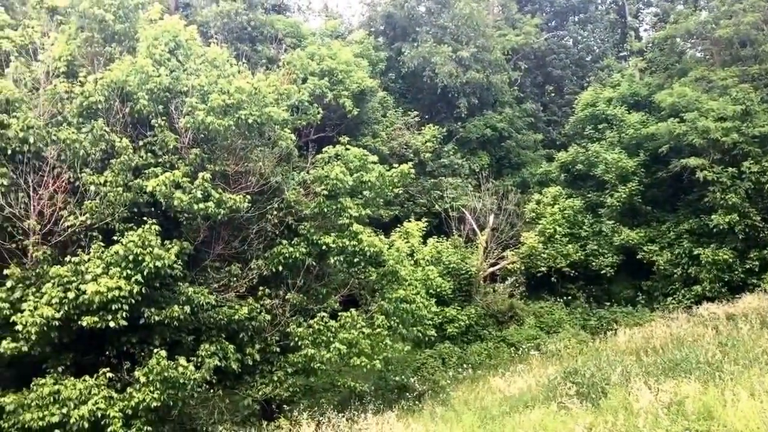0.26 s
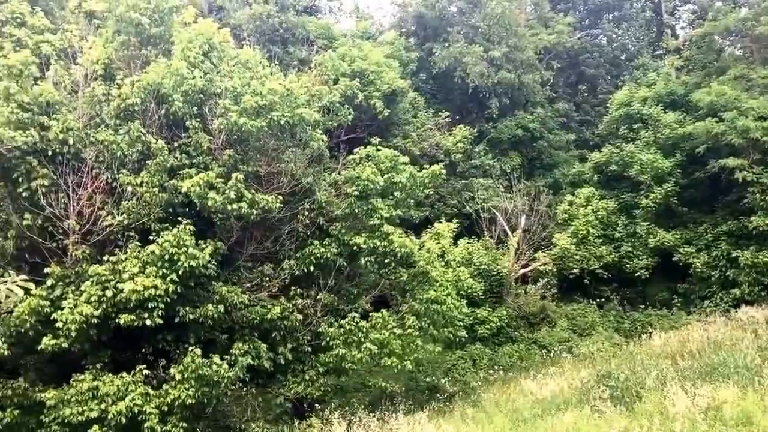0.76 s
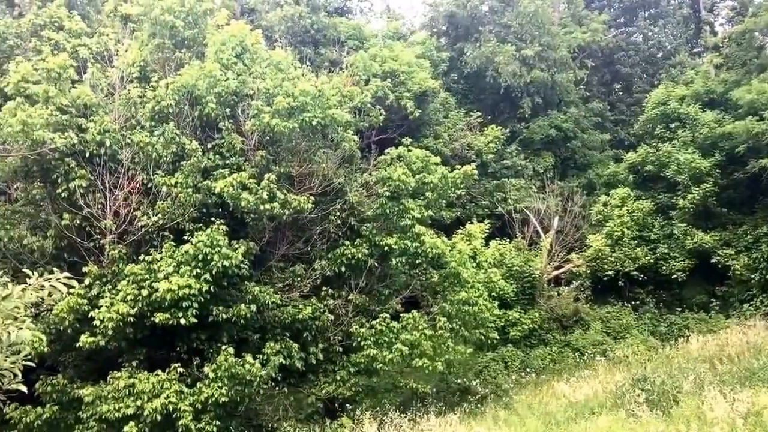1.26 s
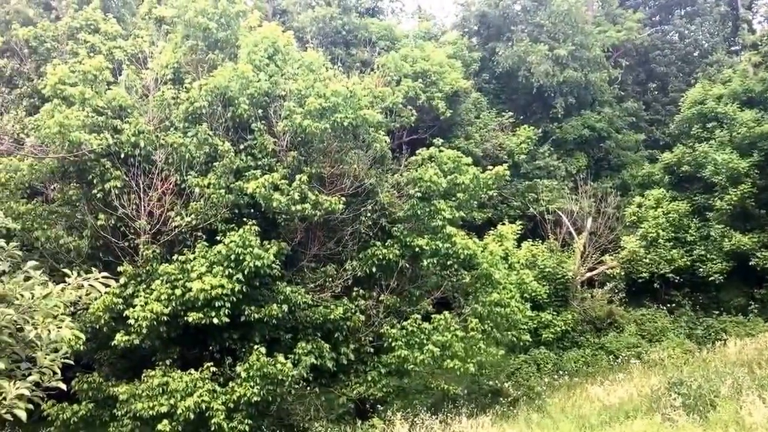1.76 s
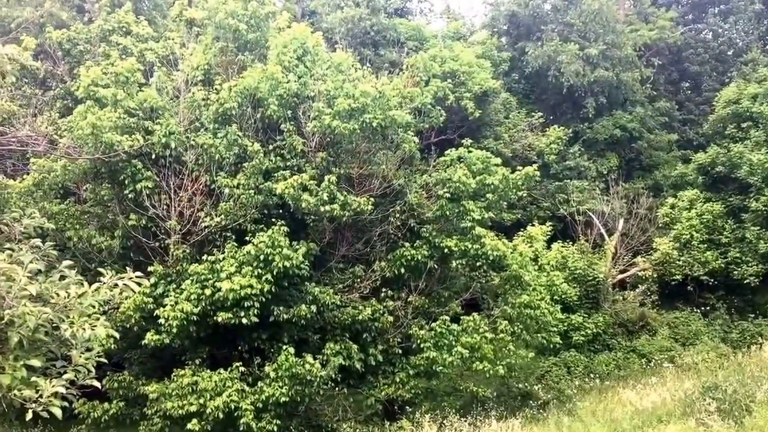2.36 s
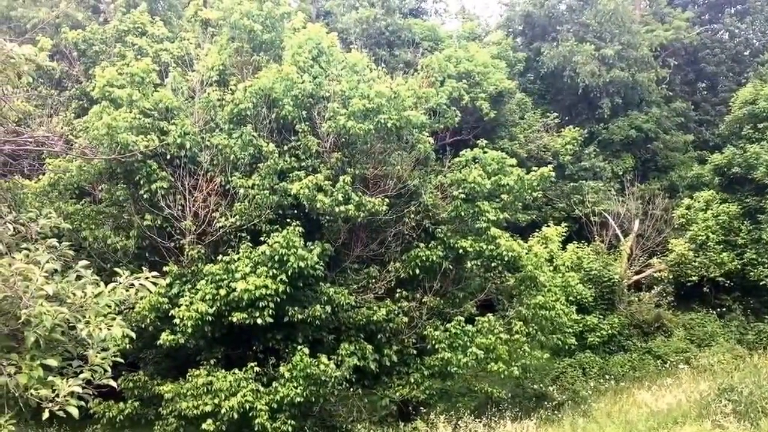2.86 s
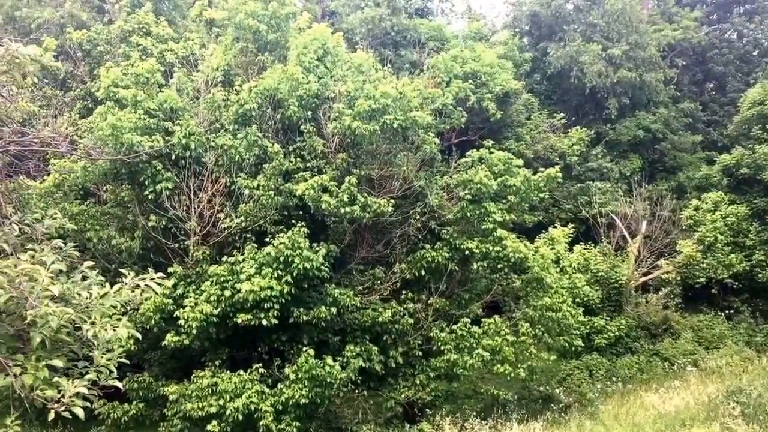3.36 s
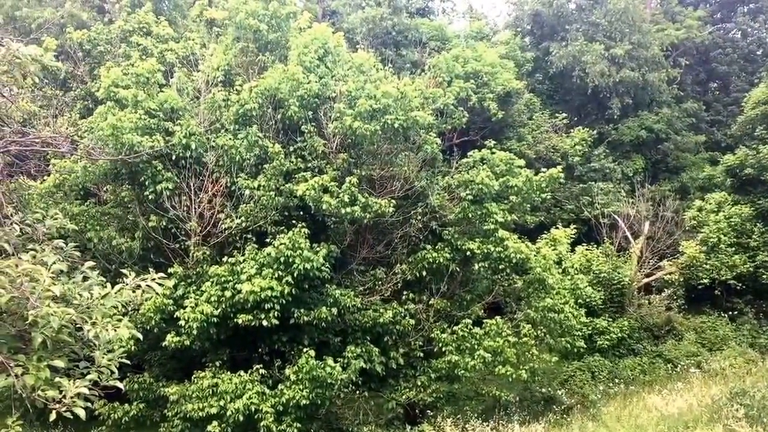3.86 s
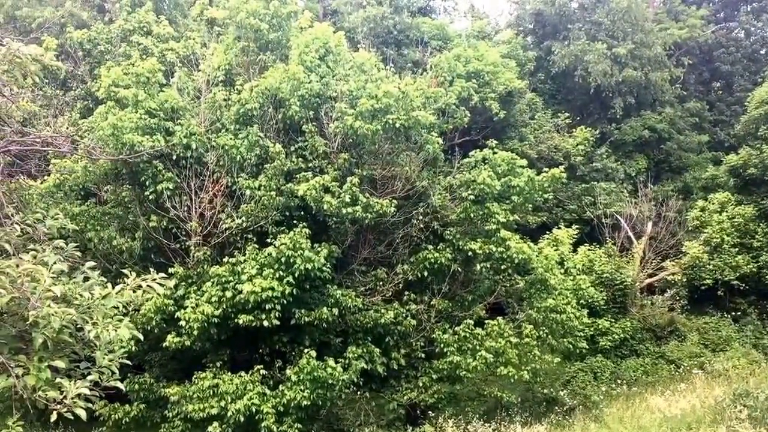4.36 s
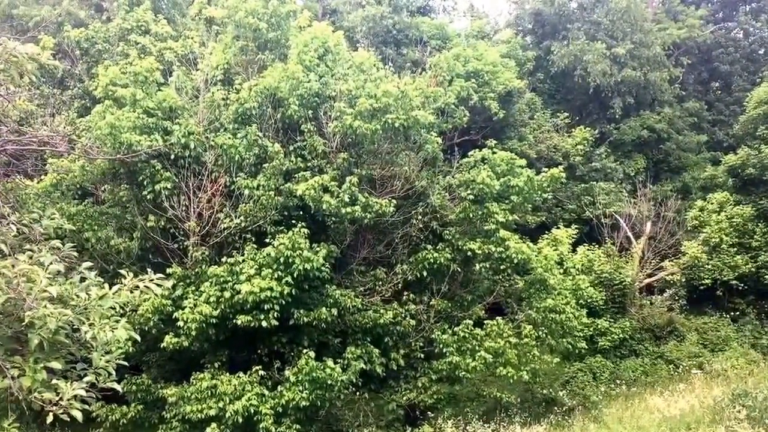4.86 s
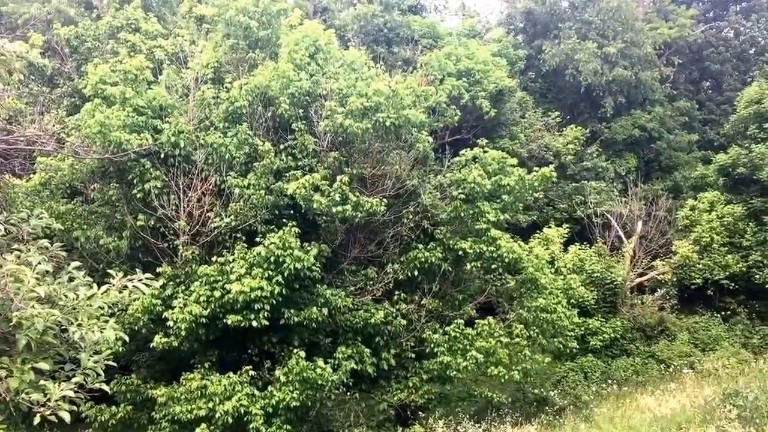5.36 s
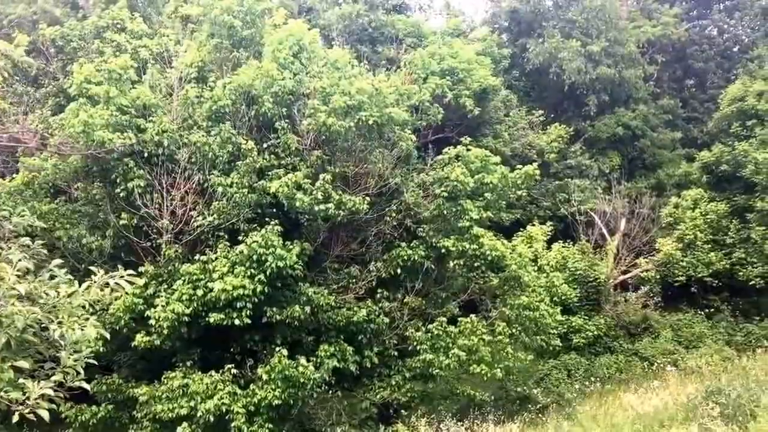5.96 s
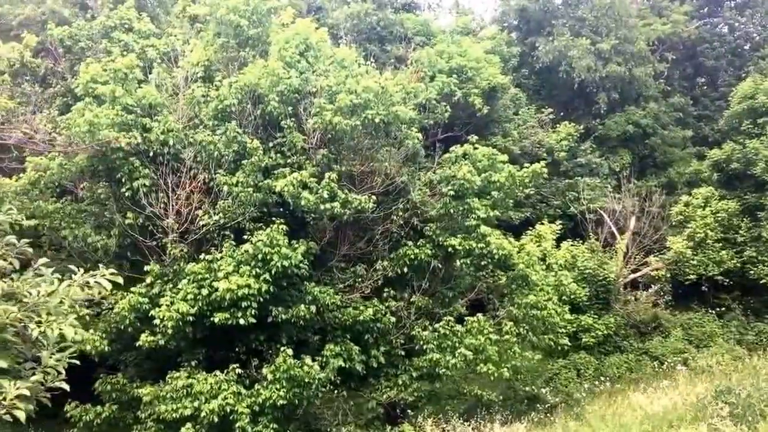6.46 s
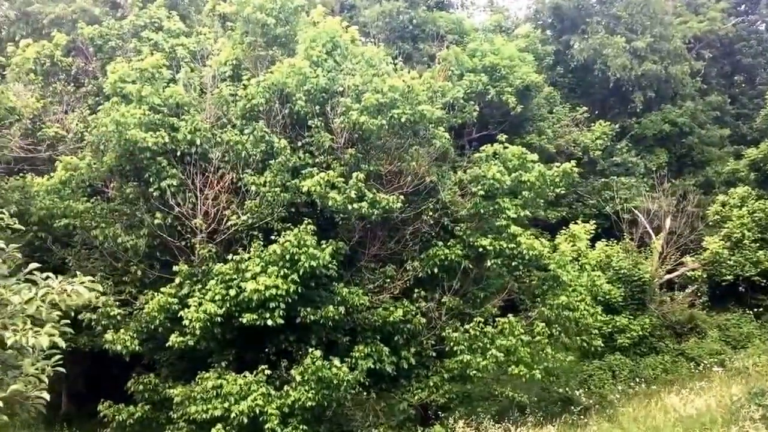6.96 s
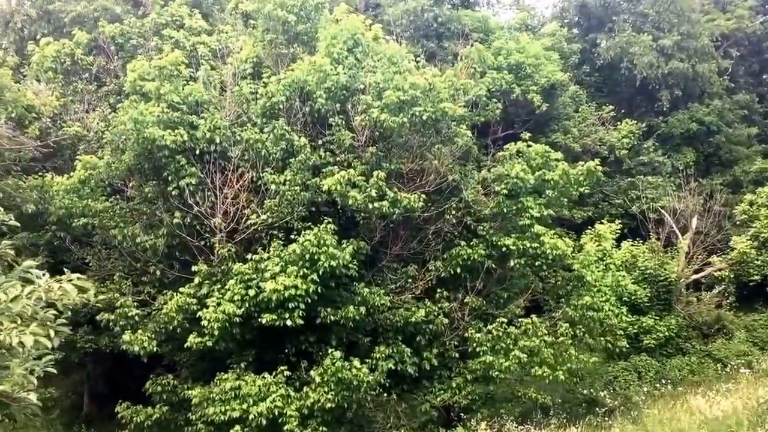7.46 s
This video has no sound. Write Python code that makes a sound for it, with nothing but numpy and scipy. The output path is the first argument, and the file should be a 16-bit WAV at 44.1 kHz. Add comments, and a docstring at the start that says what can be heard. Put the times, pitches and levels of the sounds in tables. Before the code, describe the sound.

Outdoors by thick green trees, countless cicadas sizzle in a continuous high buzz that rises, fades and begins to return. Below it a steady mid-pitched insect drone never stops, one caller briefly standing out. Distant low rumble is barely noticeable. The microphone picks up small nearby movements: dull soft bumps, brief cloth or grass brushes, and finally delicate bright metal pieces touching.

```python
"""Cicadas sing in a wood over far rumble, fuzzy hums and leaves; a larger kind holds a low drone throughout.
The shrill crowd, made of dense clicks ringing through spectral bands, swells to its loudest at 3.5 s; meanwhile
one drone caller stands out, and at 3.1 s a sagging sine thumps close by with a rustle of filtered grains.
More rustles come at 4.2 s, the shrill crowd sinks until 5.9 s and then grows again, and rustles and a thump
return from 6.6 s; decaying sine modes give a small metal tinkle from 7.4 s."""
import sys
import numpy as np
from scipy import signal
from scipy.fft import rfft, irfft, next_fast_len
from scipy.io import wavfile
from scipy.ndimage import uniform_filter1d

SR = 44100
rng = np.random.default_rng(int(sys.argv[2]) if len(sys.argv) > 2 else 0)


def wav_out(sig):
    """Save sig, one row per channel (or a flat mono array), as 16-bit PCM at SR to the path in sys.argv[1]."""
    wavfile.write(sys.argv[1], SR, np.round(np.clip(np.atleast_2d(sig).T, -1, 1) * 32767).astype(np.int16))


N = 339570


def amp(db):
    """Decibels to gain."""
    return 10 ** (np.asarray(db) / 20)


def evened(x):
    """Scales to rms 1."""
    return x / np.sqrt(np.mean(x ** 2) + 1e-20)


def read(points, hz):
    """Reads a spectrum table in dB on a log frequency axis, silent (-120 dB) outside it."""
    f, value = np.transpose(points)
    return np.interp(np.log(hz + 1), np.log(f + 1), value, left=-120, right=-120)


def level_curve(points):
    """Draws straight lines between (t/s, level/dB) points, one value a sample."""
    s, level_db = np.transpose(points)
    return np.interp(np.arange(N) / SR, s, level_db)


def bell(centre_hz, width_hz):
    """A bell-shaped spectrum, down to 1/e in magnitude at width_hz from its centre."""
    return lambda f: np.exp(-((f - centre_hz) / width_hz) ** 2)


def add(mix, s, sound):
    """Mixes a sound in at time s."""
    part = mix[round(s * SR):][:len(sound)]
    part += sound[:len(part)]


def wander(low_hz, top_hz):
    """Slow random motion of rms 1: sines of random phase at rates about low_hz to top_hz."""
    t = np.arange(0, N + 256, 256) / SR
    hz = np.geomspace(low_hz, top_hz, 30) * rng.uniform(.9, 1.1, 30)
    sines = np.sin(2 * np.pi * (hz * t[:, None] + rng.random(30)))
    slow = sines @ hz ** -.3  # slower sines weigh more
    return np.interp(np.arange(N) / SR, t, evened(slow))


def patchy(gain, patchy_db, bins, frames):
    """Random short-time spectra with drifting louder and softer patches; gain maps Hz to magnitude."""
    real, imag, patches = rng.standard_normal((N // 1024 + 5, 2049, 3)).T
    patches = uniform_filter1d(patches, bins, 0)
    patches = evened(uniform_filter1d(patches, frames, 1))
    shape = gain(np.fft.rfftfreq(4096, 1 / SR))[:, None]
    spectra = (real + 1j * imag) * shape * amp(patchy_db * patches)
    return evened(signal.istft(spectra, nperseg=4096, noverlap=3072)[1][:N])


def crowds(tone, clicks_per_s, flutter_db, flutter_hz, count):
    """Groups of callers from low to high pitch: dense uneven clicks ring each group's own part of the tone."""
    size = next_fast_len(N)
    hz = np.fft.rfftfreq(size, 1 / SR)
    centres = np.geomspace(tone[0][0], tone[-1][0], count)
    place = np.log((hz + 1) / centres[0]) / np.log(centres[1] / centres[0])
    tone_gain = amp(read(tone, hz))
    groups = []
    for k in range(count):
        clicks = rng.standard_normal(N) * (rng.random(N) < clicks_per_s / SR)
        share = np.cos(np.pi / 4 * np.clip(place - k, -2, 2))  # neighbouring groups overlap
        rung = irfft(rfft(clicks, size) * share * tone_gain, size)[:N]
        groups.append(rung * amp(flutter_db * wander(0.98, flutter_hz)))  # each group's loudness flutters
    groups = np.array(groups)
    return centres, groups / np.sqrt(np.mean(groups.sum(0) ** 2))


def rumble():
    """Far rumble: lumpy low noise that wavers quickly over a slower level curve."""
    # spectrum: f/Hz, relative level/dB
    rumble_tone = [(20, -30), (35, -28), (44, -11), (56, 3.5), (70, -5.5), (89, 4), (103, -3.5),
                   (118, -2.5), (150, -14.5), (190, -19), (260, -42)]
    # slow course: t/s, level/dB
    rumble_levels = [(0, -67), (.75, -59), (1.5, -65.5), (2.6, -60.5), (3.6, -64), (4.5, -60), (5.1, -62),
                     (6.0, -61), (6.8, -60.5), (7.25, -66), (7.7, -60.5)]
    noise = patchy(lambda hz: amp(read(rumble_tone, hz)), 1.8, bins=3, frames=2)
    waver_db = 2.2 * wander(4, 14)
    return noise * amp(waver_db + level_curve(rumble_levels))


def hums():
    """Fuzzy far hums: narrow bands of patchy noise."""
    # one hum a row: f/Hz, width/Hz, level/dB
    hum_bands = [(206.3, 13.7, -74), (243, 24, -78), (307.5, 20, -78), (373, 11, -83)]
    return sum(amp(db) * patchy(bell(hz, width), 3.9, bins=3, frames=5) for hz, width, db in hum_bands)


def leaves():
    """Leaves and far air: a steady bed of patchy, shaped noise."""
    # spectrum: f/Hz, relative level/dB
    air_tone = [(120, -2), (200, -3.5), (330, -3.5), (480, -7.5), (590, -0.5), (790, -13), (1000, -10.5),
                (1500, -10), (1900, -8), (2600, -9), (3400, -40)]
    level_db = -67
    return amp(level_db) * patchy(lambda hz: amp(read(air_tone, hz)), 2.5, bins=8, frames=4)


def thumps():
    """Soft low blows: a decaying sine whose pitch sags, with a partial just under an octave above."""
    # one blow a row: t/s, level/dB before onset and decay, f/Hz (about the starting pitch)
    blows = [(3.06, -42, 126), (6.775, -46, 111)]
    t60_s, onset_s, sag_s = 0.24, 0.0034, 0.028
    out, t = np.zeros(N), np.arange(SR // 3) / SR
    for s, db, hz in blows:
        pitch_hz = hz * (.7 + 0.305 * np.exp(-t / sag_s))
        turn = 2 * np.pi * np.cumsum(pitch_hz) / SR
        body = np.sin(turn) + 0.38 * np.sin(1.95 * turn)
        add(out, s, amp(db - 60 * t / t60_s) * (1 - np.exp(-t / onset_s)) * body)
    return out


def rustles():
    """Brief brushes of grass or cloth: fine grains under a rise and fall, each with its own brightness."""
    # one brush a row: t/s of the peak, peak level/dB, fall/s, centre f/Hz
    brushes = [(3.09, -63.5, 0.18, 2000), (4.232, -50.5, 0.058, 2600), (4.29, -62.5, .025, 800),
               (6.6, -67, .015, 900), (6.65, -55.5, .045, 1740), (6.719, -56, 0.016, 2900),
               (6.8, -66, .05, 900)]
    rise_s, width_octaves = .036, 0.66
    out, t = np.zeros(N), np.arange(-SR // 8, SR // 2) / SR
    hz = np.fft.rfftfreq(len(t), 1 / SR)
    for s, db, fall, centre_hz in brushes:
        grains = rng.standard_normal(len(t)) * (rng.random(len(t)) < 6000 / SR)
        band = np.exp(-(np.log2((hz + 1) / centre_hz) / width_octaves) ** 2)
        hiss = evened(irfft(rfft(grains) * band, len(t)))
        envelope = np.exp(-np.where(t < 0, (t / rise_s) ** 2, t / fall))
        add(out, s + t[0], amp(db) * hiss * envelope)
    return out


def tinkle():
    """Small metal pieces touch: a slow rub wakes mostly the main mode, sharper blows all of them."""
    # one touch a row: t/s, blow level/dB, rise/s, side modes' added level/dB
    touches = [(7.422, -51, .002, -10), (7.446, -48.5, .001, 2), (7.47, -35.5, .016, -20),
               (7.553, -59, .001, 9)]
    # ringing modes of the metal, main one first: f/Hz, relative level/dB, t60/s
    modes = [(11602, 8, .11), (9080, 6, .15), (8455, 5, .08), (10950, -5, .08), (14600, -5, .02)]
    out, t, phases = np.zeros(N), np.arange(SR // 5) / SR, rng.random(len(modes))
    for s, blow_db, rise, side_db in touches:
        onset = 1 - np.exp(-(t / rise) ** 2)
        clock = t + round(s * SR) / SR  # each mode keeps its phase from touch to touch
        for k, (hz, db, t60) in enumerate(modes):
            mode_db = blow_db + db + (side_db if k else 0)
            ring = np.sin(2 * np.pi * (hz * clock + phases[k]))
            add(out, s, amp(mode_db - 60 * t / t60) * ring * onset)
    return out


def drone():
    """The low chorus of ringing clicks at a held level, with one nearer caller standing out for a while."""
    # spectrum of the chorus: f/Hz, relative level/dB
    drone_tone = [(560, -32), (950, -21), (1010, -20.5), (1200, -3), (1320, 4), (1390, 0.5), (1480, -13),
                  (1570, -17), (1800, -32.5), (2340, -71), (3960, -120)]
    # the nearer caller: start t/s, end t/s, f/Hz, width/Hz, level/dB
    soloist = (1.5, 3.6, 1395, 14, -65)
    chorus_db, fade_s = -53.5, .15
    start, end, hz, width, db = soloist
    t = np.arange(N) / SR
    fade = np.clip(np.minimum(t - start, end - t) / fade_s, 0, 1)
    solo = amp(db) * patchy(bell(hz, width), 1.5, bins=3, frames=6) * fade
    _, groups = crowds(drone_tone, 6000, 1.47, 9, count=16)
    return groups.sum(0) * amp(chorus_db) + solo


def shrill():
    """The swelling chorus of ringing clicks; its low callers join late and leave late."""
    # swell of the chorus: t/s, level/dB
    swell = [(0.0, -30), (0.06, -29.5), (0.3, -30.5), (1.59, -29), (2.81, -25.5), (3.5, -21), (4.48, -22.5),
             (5.86, -31), (7.7, -27)]
    # spectrum of the chorus: f/Hz, relative level/dB
    shrill_tone = [(2350, -46), (3800, -12.5), (4300, -10), (4850, -13), (5150, -5.5), (5900, 0),
                   (6700, -7.5), (7600, -19), (8400, -19.5), (10250, -34), (11700, -29.5), (12700, -32.5),
                   (13800, -41.5), (15800, -45)]
    low_callers_below_hz = 5430
    linger_db_per_octave = 0.29  # for each dB a second that the swell falls; a cut while it rises
    level_db = level_curve(swell)
    fall_db_per_s = -uniform_filter1d(np.gradient(level_db) * SR, SR // 2)
    centres, groups = crowds(shrill_tone, 20000, 0.85, 20, count=32)
    octaves_below = np.maximum(np.log2(low_callers_below_hz / centres), 0)[:, None]
    lingering = amp(linger_db_per_octave * octaves_below * fall_db_per_s)
    return (groups * lingering).sum(0) * amp(level_db)


def scene():
    """Everything as one microphone hears it."""
    background = rumble() + hums() + leaves()
    close_by = thumps() + rustles() + tinkle()
    return (background + close_by + drone() + shrill())[None]


def record(dry):
    """A slow gain control leans against the swell; then a bass cut and a treble limit."""
    duck_from_db, duck_share, duck_s = -27.5, 0.17, 0.2
    low_cut_hz, treble_edge_hz = 27, 15340
    power = uniform_filter1d(dry ** 2, int(duck_s * SR))
    power_db = 10 * np.log10(abs(power) + 1e-12)
    ducked = dry / amp(duck_share * np.maximum(power_db - duck_from_db, 0))
    bass_cut = signal.butter(2, low_cut_hz, "high", fs=SR, output="sos")
    treble_limit = signal.firwin(2047, treble_edge_hz, window=("kaiser", 9), fs=SR)
    return signal.oaconvolve(signal.sosfilt(bass_cut, ducked), treble_limit[None], "same")


dry = scene()
out = record(dry)
wav_out(out)
```